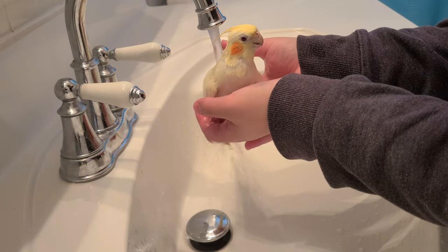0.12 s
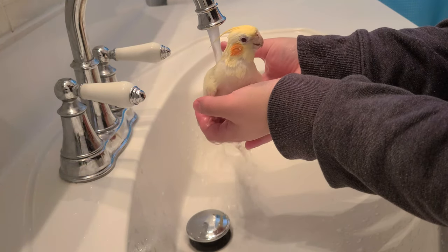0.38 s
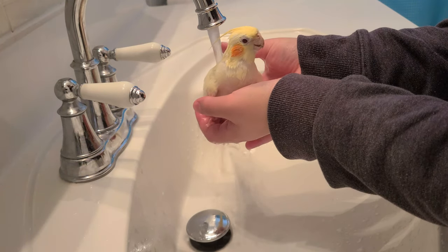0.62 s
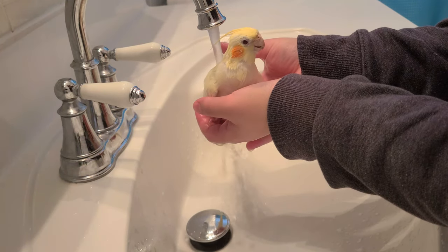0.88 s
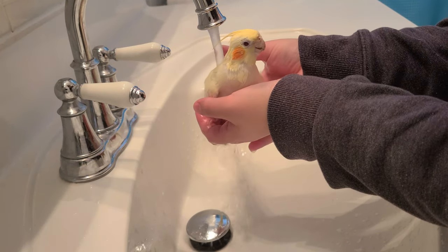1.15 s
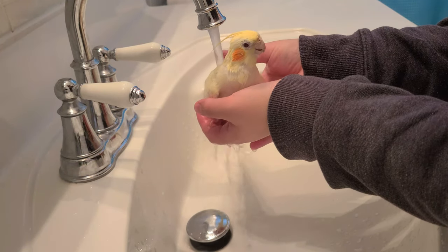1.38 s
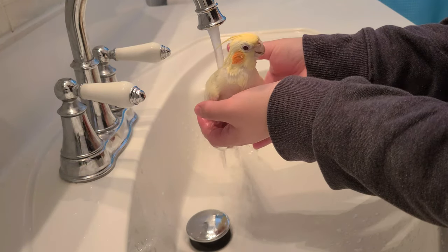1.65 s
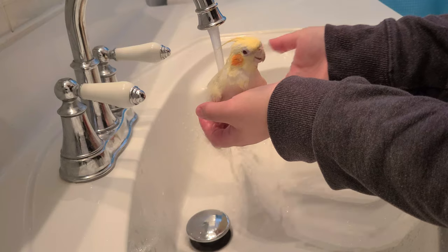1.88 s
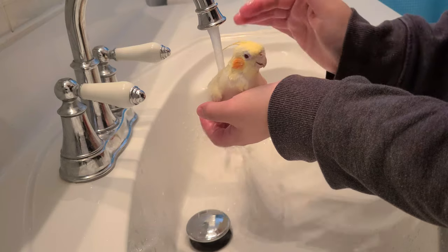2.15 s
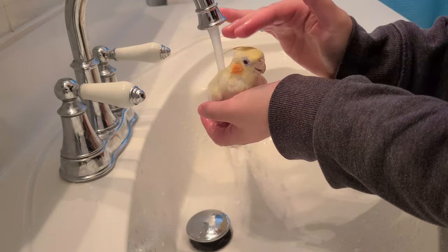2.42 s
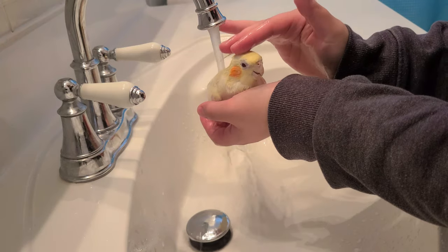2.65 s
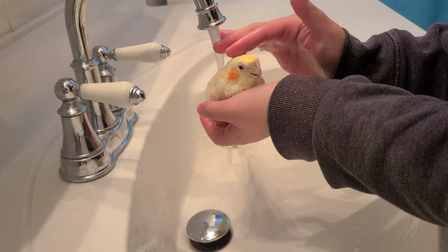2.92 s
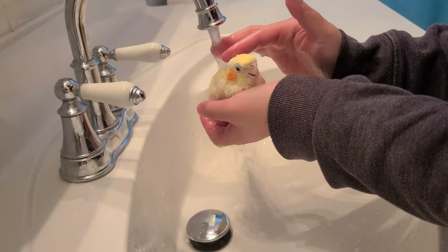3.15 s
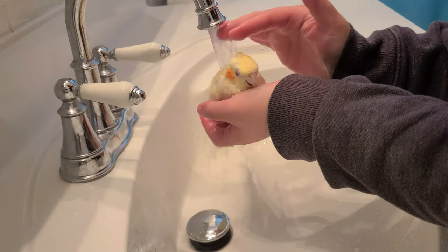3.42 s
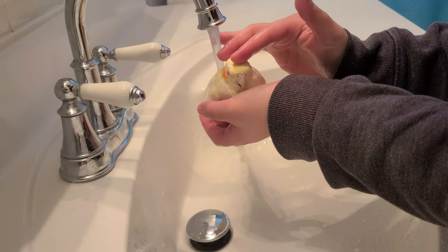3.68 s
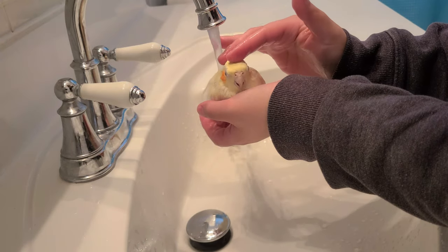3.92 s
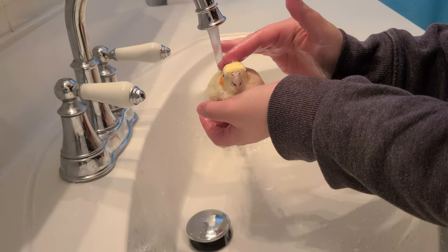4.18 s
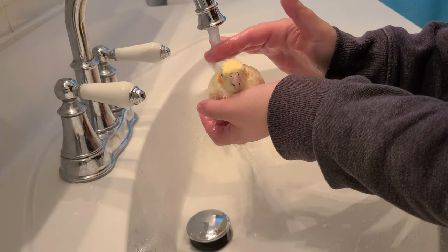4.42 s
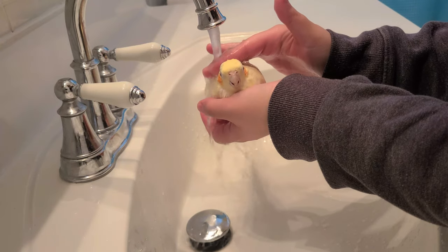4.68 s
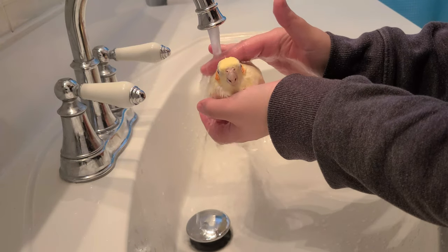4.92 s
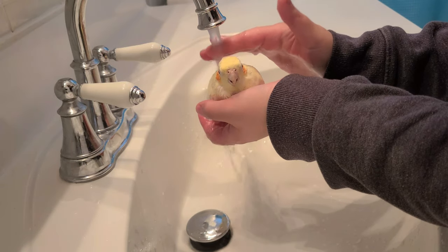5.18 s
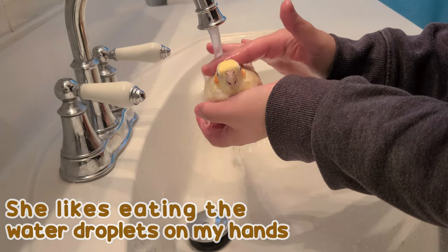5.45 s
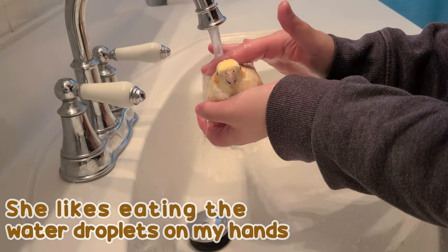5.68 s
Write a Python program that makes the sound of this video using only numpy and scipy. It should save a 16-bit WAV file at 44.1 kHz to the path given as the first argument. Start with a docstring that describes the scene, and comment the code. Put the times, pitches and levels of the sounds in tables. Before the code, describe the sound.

A tap runs into a ceramic sink in a small tiled bathroom, heard close in stereo. Its steady, airy hiss is brighter on the left. The drain sucks air about four times a second throughout. Tiny bubbles fizz, single drops tick and plop, and hands under the stream cause brief spatter near 1.6, 3.5 and 4 seconds, with a small wet slap around 5.5. A low room hum stays underneath.

```python
"""A tap with an aerator runs into a ceramic basin in a small hard-walled bathroom, close to two microphone ports.
The spout hisses as noise through pipe and basin resonances, with the hum of the room below; the drain slurps
air about four times a second as noise in its cavity modes. Drops and fizz ring as bubbles, slaps as an air
pocket, and spatter, plops and thuds are puffs of noise. A low rumble of wandering level and the whistle of
the overflow are narrow-band noise; a dense tail answers everything close."""
import sys
import numpy as np
from scipy import signal
from scipy.fft import rfft, irfft, next_fast_len
from scipy.io import wavfile
from scipy.ndimage import uniform_filter1d

SR = 44100
rng = np.random.default_rng(int(sys.argv[2]) if len(sys.argv) > 2 else 0)


def dump(signal):
    """Clip the signal to [-1, 1] and save it as 16-bit WAV at the path in sys.argv[1]."""
    limited = np.clip(np.atleast_2d(signal).T, -1, 1)
    pcm = np.round(limited * 32767).astype(np.int16)
    wavfile.write(sys.argv[1], SR, pcm)


def invert_db(level):
    """Linear amplitude ratio for a level in decibels (20 dB per decade), elementwise."""
    return 10 ** (np.asarray(level, dtype=float) / 20)


N = 256662   # length in samples

# Rush of the stream between its resonances: pitch_hz, left_db per Hz, right_db per Hz
RUSH = [(25, -92.5, -94), (80, -101, -99), (253, -93, -94.5), (493, -100.5, -102.5), (810, -95.5, -98.5),
        (1210, -94, -93), (2200, -92.5, -92.5), (3010, -90.5, -84.5), (5300, -104, -91),
        (7700, -86.5, -87.5), (9400, -83.5, -99.5), (11200, -82.5, -92.0), (14100, -77, -90),
        (15700, -77.5, -84)]
# Resonances of room, basin, drain pipe and spout: pitch_hz, width_hz, left_db per Hz, right_db per Hz
ROOM_HUM = [(57, 19, -80.7, -81.0), (123, 28, -74.0, -74.8), (145, 24, -81.2, -81.2), (176, 20, -88, -89),
            (291, 56, -90.5, -92.8)]
BASIN_MODES = [(346, 69, -95.5, -90.5), (360, 64, -83.7, -105), (408, 73, -83.4, -95.9),
               (459, 60, -92, -93), (622, 77, -87, -91), (830, 120, -97.0, -99), (977, 109, -97.5, -94),
               (1038, 32, -91.5, -101.5), (1148, 67, -94.2, -93.8), (1255, 130, -86.6, -105),
               (1272, 38, -93.6, -90.2), (1426, 39, -94.9, -85.6), (1472, 72, -87.4, -84.1),
               (1526, 104, -91.5, -84.7), (1584, 32, -86.4, -86.5), (1659, 137, -89.4, -90.9),
               (1765, 48, -80.5, -89), (1823, 287, -90.5, -94), (1853, 22, -84.5, -86),
               (1903, 26, -87.8, -106.5)]
PIPE_MODES = [(2480, 200, -89, -98), (2870, 260, -84, -94.6), (3255, 125, -78.7, -86.5),
              (3600, 400, -83.5, -94.4), (4030, 212, -82, -87.5), (4420, 150, -83, -89),
              (4680, 596, -78.6, -85.2), (5230, 105, -87.2, -86.9), (5480, 504, -82.5, -95.8),
              (5812, 110, -75.5, -81), (5990, 83, -82.8, -81.2), (6200, 179, -91, -88),
              (6490, 316, -89.5, -86.1), (6780, 246, -83, -83), (7150, 164, -82.8, -93.0),
              (7910, 299, -84.1, -89.7), (8280, 97, -83.1, -91.9), (8540, 332, -84.4, -104),
              (8870, 301, -85.7, -90.9)]
SPOUT_MODES = [(10680, 400, -77, -86), (11120, 100, -80, -88), (11350, 110, -71, -78),
               (11575, 130, -67, -78), (11890, 630, -77, -85), (12200, 500, -79, -88),
               (12750, 130, -74, -83), (13280, 300, -73.5, -90), (13750, 300, -77, -96),
               (14270, 350, -73.5, -96), (15070, 330, -69.5, -85), (15490, 300, -71, -86)]
# Power of the stream that both ports share: pitch_hz, share (0-1)
SHARED_POWER = [(30, 0.9), (150, 0.99), (290, 0.96), (600, 0.3), (1200, 0.7), (3000, 0.76), (8000, 0.92),
                (15000, 0.52)]
# Strength of the flow: time_s, gain_db
FLOW_GAIN = [(0, -1), (.4, 0), (1.5, 0), (2.5, 0.3), (3.5, 0.3), (4.5, 0.14), (5.2, 0.95), (5.82, 0.5)]

# Drain slurps: time_s, bright_stage_db, dark_stage_db
SLURP_TIMES = [(0.136, -50, -46.5), (0.303, -48, -46.5), (0.555, -48.5, -48), (0.801, -52, -48),
               (1.004, -45.5, -49), (1.2, -46, -48.5), (1.371, -47, -50.5), (1.612, -47, -48),
               (1.88, -49.5, -45.5), (2.16, -46, -45.5), (2.415, -48.5, -54), (2.67, -45, -48),
               (2.9, -45, -46), (3.182, -47, -48), (3.403, -48, -46), (3.626, -47, -47.5),
               (3.85, -47.5, -44), (4.122, -46.5, -43.5), (4.35, -49, -46), (4.555, -48.5, -43.5),
               (4.79, -46.5, -46), (5.025, -48, -46), (5.264, -47, -45.5), (5.488, -49, -45),
               (5.737, -47, -46)]
# Drain cavity modes: pitch_hz, width_hz of each filter pass, gain_db, left_minus_right_db,
# lateness (0 bright stage, 1 dark stage), nominal length_s
DRAIN_MODES = [(12700, 6700, -2.5, 19, -0.2, 0.036), (10800, 2100, -3.5, 12, 0.27, 0.04),
               (8720, 1800, 0.8, 9.5, 0.076, 0.034), (7120, 1870, 0, 9, 0.38, 0.047),
               (5820, 940, -4, 8, 0.51, 0.049), (4980, 640, 0, 6, 0.73, 0.063),
               (4360, 700, 0.5, 2.5, 0.96, 0.066), (3700, 700, -5.5, -8.5, 1.35, 0.044),
               (2770, 680, -12, -2, 1.68, 0.071), (1800, 84, -11.5, 6.5, 1.19, 0.091)]
SLURP_LAG_S = 0.035   # the dark stage follows the bright one by this much

# Plops and ticks of single drops: start_s, pitch_hz, level_db
DROP_HITS = [(0.0642, 2810, -37.5), (0.3078, 3630, -35), (1.6959, 2010, -45.7), (2.405, 3400, -44),
             (2.4339, 2710, -40.5), (2.446, 3300, -44), (2.462, 3600, -45), (3.5245, 2940, -34),
             (3.535, 3200, -41), (3.5455, 2800, -40), (3.558, 3100, -45), (3.8933, 3680, -34),
             (3.9, 4600, -35), (4.9304, 3550, -39), (5.5415, 4800, -34), (5.738, 3360, -36.5)]
RING_CYCLES = 10.0    # ring length of a drop's bubble in cycles, whatever its size
# Bubbles that burst at once and whip upward: start_s, low_hz, high_hz, level_db
SNAP_HITS = [(4.5185, 2520, 6000, -33), (4.9295, 2810, 7000, -29), (5.4625, 2700, 4800, -36),
             (5.732, 4000, 6500, -34)]
SNAP_S = 0.006

# Noise puffs, levels ahead of each layer's trim
# Spatter off the fingers: start_s, level_db, pitch_hz
SPATTER_HITS = [(0.9524, -34.5, 5820), (1.3576, -37, 6810), (1.5648, -26, 6600), (3.5114, -28.5, 4670),
                (3.9943, -25.5, 8750), (3.9945, -35, 1500), (3.9982, -30, 10800), (5.7924, -27, 7510),
                (5.7928, -33, 2200)]
# Slugs of water landing in the basin: start_s, level_db, pitch_hz
THUD_HITS = [(0.595, -47, 417), (0.784, -44.5, 200), (1.111, -48, 344), (1.541, -39.5, 347),
             (1.618, -44, 370), (1.655, -47, 390), (1.699, -48.5, 230), (2.173, -48, 353),
             (2.256, -46.5, 373), (3.028, -48, 371), (3.33, -48, 202), (3.545, -47, 380), (3.881, -44, 347),
             (3.991, -47, 353), (4.319, -46.5, 398), (4.978, -50, 340), (5.233, -46, 380), (5.45, -49, 210),
             (5.789, -48, 436)]
# Soft plops that set a basin mode ringing: start_s, level_db, pitch_hz
PLOP_HITS = [(0.7537, -44.5, 1490), (1.128, -48, 1500), (1.4841, -44, 1500), (2.3286, -45.5, 1470),
             (3.6459, -47.5, 595), (3.949, -49, 607), (3.9518, -40.5, 1510), (5.503, -43.5, 1800),
             (5.513, -48, 591)]

# A handful of water slaps into the cupped hands: start_s, level_db
SLAP_HITS = [(3.547, -45), (5.2304, -47), (5.5148, -37.5)]
# Modes of the air pocket in the cupped hands: pitch_hz, gain_db, t60_s
CUP_MODES = [(980, -3.5, 0.049), (1510, 0, .04), (2660, 2.5, 0.04), (1280, -6, .03)]
# The two ports favour different pitches of anything in the basin: pitch_hz, left_minus_right_db
PORT_LEAN = [(200, 2.5), (380, 9), (600, 1), (1000, -3), (1500, -6), (2800, 5), (4500, 0), (6000, 5),
             (11000, 5)]

# Level of the low rumble, 150-300 Hz, ahead of its trim: time_s, level_db
RUMBLE_LEVEL = [(0, -69), (.45, -66), (.75, -59), (.95, -63), (1.15, -59.5), (1.6, -61), (1.9, -67),
                (2.3, -66.5), (2.5, -59.5), (2.85, -70), (3.1, -59), (3.5, -63), (3.85, -60.5), (4.1, -66),
                (4.6, -66), (5.25, -67), (5.48, -57), (5.7, -63)]
# Bands of the low rumble: pitch_hz, width_hz, gain_db
RUMBLE_BANDS = [(175.2, 24, 0), (213, 36, -3)]
RUMBLE_TRIM_DB = -4.5
# Faint uneven singing of the overflow pipe: time_s, level_db
WHISTLE_LEVEL = [(0, -72), (.5, -74), (.7, -79), (1.05, -69), (1.4, -80), (2.05, -67), (2.3, -77),
                 (2.7, -66), (3.05, -70), (3.3, -81), (3.65, -67), (3.95, -68), (4.3, -78), (4.9, -68.5),
                 (5.1, -73), (5.3, -69), (5.82, -75)]
WHISTLE_HZ, WHISTLE_WIDTH_HZ = 609.8, 27   # width of each filter pass

ROOM_T60_S, ROOM_DB = 0.13, -9
CUTOFF_HZ = 15730


def rms_one(x):
    """Scales a sound to rms 1."""
    return x / np.sqrt(np.mean(x ** 2) + 1e-20)


def at_hz(points, hz):
    """Reads a curve at a pitch, on a logarithmic pitch axis."""
    table = np.array(points)
    return np.interp(np.log(hz), np.log(table[:, 0]), table[:, 1])


def over_time(points):
    """Draws a dB curve over the whole scene."""
    time_s, db = np.transpose(points)
    return np.interp(np.arange(N) / SR, time_s, db)


def sides(lean_db):
    """Left and right gains for a level difference."""
    return invert_db(np.multiply.outer([.5, -.5], lean_db))


def drift(rate_hz):
    """Slow chance of spread 1: noise at every 40th sample through a double one-pole low-pass."""
    r = np.exp(-80 * np.pi * rate_hz / SR)
    noise = rng.standard_normal(N // 40 + 2002)
    slow = signal.lfilter([1], [1, -2 * r, r * r], noise)[2000:]   # the filter has settled
    return np.interp(np.arange(N) / 40, np.arange(len(slow)), rms_one(slow))


def resonate(x, hz, width_hz):
    """Two-pole resonance, gain 1 on top."""
    r = np.exp(-np.pi * width_hz / SR)
    gain = (1 - r * r) / 2
    return signal.lfilter([gain, 0, -gain], [1, -2 * r * np.cos(2 * np.pi * hz / SR), r * r], x)


def resonate_twice(x, hz, width_hz):
    """The same resonance in series with itself, for steeper skirts."""
    return resonate(resonate(x, hz, width_hz), hz, width_hz)


def grains(per_s, spread_db):
    """Random clicks of very uneven size, rms 1."""
    size_db = spread_db * np.minimum(rng.exponential(1, N), 5)
    sizes = invert_db(size_db) * rng.choice([-1, 1], N)
    return rms_one(sizes * (rng.random(N) < per_s / SR)) + 1e-18


def bursts(rows, decay_ms, spread, trim_db):
    """A dying puff of noise per row, in a band round its pitch; spread is the width over the pitch."""
    out = np.zeros((2, N))
    u = np.arange(2000) / (decay_ms / 1000 * SR)   # time in decay lengths
    shape = np.minimum(5 * u, 1) * np.exp(-u)
    for start_s, level_db, hz in rows:
        narrow = resonate(rng.standard_normal(4000), hz, spread * hz)
        puff = resonate(narrow, hz, 2 * spread * hz)[2000:]
        puff = rms_one(puff * shape) * np.sqrt(np.mean(shape ** 2))
        at = round(start_s * SR)
        both = np.outer(sides(at_hz(PORT_LEAN, hz)), puff)
        out[:, at:at + 2000] += invert_db(level_db + trim_db) * both[:, :N - at]
    return out


def room(close):
    """Basin and tiles answer with a dense decaying tail, another one on each side."""
    t = np.arange(round(.4 * SR)) / SR
    tail = rng.standard_normal((2, len(t))) * invert_db(-60 * t / ROOM_T60_S) * (t > .003)
    tail = tail / np.sqrt(np.sum(tail ** 2, axis=1, keepdims=True))
    return invert_db(ROOM_DB) * signal.fftconvolve(close, tail, axes=1)[:, :N]


def rumble(wander_db=2.5):
    """Low narrow-band noise whose level wanders."""
    noise = rng.standard_normal(N) + .25 * rng.standard_normal((2, N))
    tone = np.zeros((2, N))
    for hz, width_hz, gain_db in RUMBLE_BANDS:
        # two passes narrow the band, so each is set wider
        tone += invert_db(gain_db) * rms_one(resonate_twice(noise, hz, 1.44 * width_hz))
    level_db = over_time(RUMBLE_LEVEL) + RUMBLE_TRIM_DB + wander_db * drift(8.6)
    return rms_one(tone) * invert_db(level_db) * sides(2.0)[:, None]


def whistle():
    """Air drawn across the overflow opening excites its one narrow mode."""
    noise = rng.standard_normal(N) + 1.45 * rng.standard_normal((2, N))
    tone = resonate_twice(noise, WHISTLE_HZ, WHISTLE_WIDTH_HZ)
    return rms_one(tone) * invert_db(over_time(WHISTLE_LEVEL))


def fizz(level_db=-64.5):
    """Countless small bubbles ring a few cycles each, at pitches spread over four octaves."""
    out = np.zeros((2, N))
    for hz in np.geomspace(330, 6000, 16):
        ring = resonate(grains(per_s=hz / 50.0, spread_db=5.0), hz, hz / 7.34)
        ring = rms_one(resonate(ring, hz, hz / 4.2)) * invert_db(3.9 * np.log2(hz / 2000))
        pair = [ring, np.roll(ring, rng.integers(-30, 30))]   # up to 30 samples between the ports
        out += pair * sides(rng.normal(0, 2.6))[:, None]
    return invert_db(level_db) * rms_one(out)


def thuds():
    """Dull knocks where a slug of water lands on the ceramic."""
    return bursts(THUD_HITS, decay_ms=17.0, spread=0.17, trim_db=-7.5)


def plops():
    """Short narrow rings that sink into the flow."""
    return bursts(PLOP_HITS, decay_ms=11.0, spread=0.045, trim_db=-3.0)


def spatter():
    """Bright snaps where spray breaks on the fingers."""
    return bursts(SPATTER_HITS, decay_ms=1.0, spread=0.97, trim_db=-3.0)


def slaps():
    """Each slap sets every mode of the air pocket ringing, with a strength of its own."""
    out, t = np.zeros((2, N)), np.arange(4000) / SR
    for start_s, level_db in SLAP_HITS:
        at = round(start_s * SR)
        for hz, gain_db, t60_s in CUP_MODES:
            mode_db = level_db + gain_db + rng.normal(0, 1.5) - 60 * t / t60_s
            ring = np.sin(2 * np.pi * hz * t) * invert_db(mode_db) * np.minimum(t / .001, 1)
            out[:, at:at + 4000] += np.outer(sides(at_hz(PORT_LEAN, hz)), ring)
    return out


def snaps(rough=0.42):
    """A fast upward sweep, roughened by the tearing film."""
    out, u = np.zeros((2, N)), np.arange(round(SNAP_S * SR)) / (SNAP_S * SR)
    shape = np.minimum(u / .06, 1) * np.exp(-1.8 * u) * (1 - u ** 4)
    for start_s, low_hz, high_hz, level_db in SNAP_HITS:
        hz = low_hz * (high_hz / low_hz) ** u
        tearing = uniform_filter1d(rng.standard_normal((2, len(u))), size=4)
        sweep = np.sin(2 * np.pi * np.cumsum(hz) / SR) * (1 + rough * tearing)
        at = round(start_s * SR)
        out[:, at:at + len(u)] += invert_db(level_db) * sides(at_hz(PORT_LEAN, hz)) * sweep * shape
    return out


def drops(rise=0.032, crack_db=-5.0):
    """A trapped bubble rings and climbs in pitch as it nears the surface; its birth cracks."""
    out = np.zeros((2, N))
    for start_s, hz, level_db in DROP_HITS:
        ring_s = RING_CYCLES / hz
        u = np.arange(round(6 * ring_s * SR)) / (ring_s * SR)     # time in ring lengths
        phase = 2 * np.pi * hz * np.cumsum(1 + rise * (u - .5)) / SR
        ring = np.sin(phase) * 1.8 * (1 - np.exp(-u / .1)) * np.exp(-1.1 * u)
        crack = resonate(rng.standard_normal(9000), hz, hz * .8)[-len(u):]
        sound = invert_db(level_db) * (ring + invert_db(crack_db) * 2 * crack * np.exp(-1.6 * u))
        at = round(start_s * SR)
        gains = sides(at_hz(PORT_LEAN, hz))
        for side, start in enumerate((at, at + rng.integers(-2, 3))):     # the ports lie apart
            out[side, start:start + len(u)] += gains[side] * sound[:N - start]
    return out


def slurps(grit=0.66, alike=0.57, ragged_db=1.6):
    """Air tears through the closing water film: high cavity modes sound first, low ones as the gap widens."""
    out = np.zeros((2, N))
    gritty = grains(per_s=2500., spread_db=3.0)
    air = grit * gritty + alike * rng.standard_normal(N) + rng.standard_normal((2, N)) * 0.67
    for hz, width_hz, gain_db, lean_db, late, length_s in DRAIN_MODES:
        swell = np.zeros(N)
        darkness = np.clip(late, 0, 1)
        span = round(1.46 * length_s * SR)
        u = np.arange(span) / span
        # quick rise, rounded fall
        hump = np.minimum(u / (0.11 + 0.082 * darkness), 1) * np.cos(np.pi * u / 2) ** 1.01
        for time_s, bright_db, dark_db in SLURP_TIMES:
            at = round((time_s + late * SLURP_LAG_S - length_s / 2) * SR)
            level_db = (1 - darkness) * bright_db + darkness * dark_db
            swell[at:at + span] += (invert_db(level_db) * hump)[:N - at]
        tone = rms_one(resonate_twice(air, hz, width_hz))
        out += tone * swell * invert_db(gain_db + ragged_db * drift(64.0)) * sides(lean_db)[:, None]
    return out


def stream_power(hz, ripple_db=1.35):
    """Power spectrum at each port: the rush, its resonances and a fine ripple."""
    rush = np.array(RUSH)
    power = np.array([invert_db(2 * at_hz(rush[:, [0, side]], hz)) for side in (1, 2)])
    for centre, width, left_db, right_db in ROOM_HUM + BASIN_MODES + PIPE_MODES + SPOUT_MODES:
        near = slice(*np.searchsorted(hz, [centre - 5 * width, centre + 5 * width]))
        bell = 1 / (1 + (2 * (hz[near] - centre) / width) ** 2) ** 2
        power[:, near] += invert_db(2 * np.array([[left_db], [right_db]])) * bell
    # echoes in the tiled room leave a fixed fine ripple on the colour
    ripple = [np.interp(hz / 30.0, np.arange(1000), row) for row in rng.standard_normal((2, 1000))]
    return power * invert_db(2 * ripple_db * np.array(ripple) * (hz > 2000))


def stream(slow_db=0.81, fast_db=2.5, turn=2.93, turn_hz=240.0, patter_db=1.38):
    """Noise coloured by the resonances; each quarter-octave band flickers a little on its own."""
    size = next_fast_len(N)
    hz = np.maximum(np.fft.rfftfreq(size, 1 / SR), 1)
    power = stream_power(hz)
    # the two ports hear one source by different echo paths: above the bass the phase between them wanders
    wander = np.interp(hz / 45.0, np.arange(800), rng.standard_normal(800))
    turned = np.exp(1j * turn * wander * np.clip(hz / turn_hz - 1, 0, 1))
    alike = np.clip(at_hz(SHARED_POWER, hz), 0, 1)
    shared, left, right = rfft(rng.standard_normal((3, size)))
    common = np.sqrt(alike) * shared * [np.ones(len(hz)), turned]
    separate = np.sqrt(1 - alike) * np.array([left, right])
    spectrum = (common + separate) * np.sqrt(power * SR / 2)
    out = np.zeros((2, N))
    step = 4 * np.log2(np.clip(hz, 250, 16000) / 250)   # quarter octaves above 250 Hz
    together_db = slow_db * drift(5.0)
    for k in range(25):
        band = irfft(spectrum * np.clip(1 - abs(step - k), 0, 1), size)[:, :N]
        # the spout hiss on top stays smooth
        broken = np.interp(k, [0, 2, 10, 14, 19, 22], [.8, 1.4, 1, .55, .5, .15])
        flicker_db = broken * fast_db * drift(8.6) + patter_db * (4 < k < 20) * drift(30.0)
        out += band * invert_db(together_db + flicker_db)
    return out * invert_db(over_time(FLOW_GAIN))


def scene():
    """Sums all layers; only the close water sounds feed the room tail."""
    close = drops() + snaps() + plops() + slaps() + spatter() + thuds() + fizz()
    return stream() + rumble() + whistle() + slurps() + close + room(close)


def top_cut(x):
    """Nothing passes above the cut-off."""
    return signal.sosfilt(signal.butter(12, 16590, fs=SR, output="sos"), x)


def record(dry):
    """A steep elliptic low-pass cuts the top of the mix."""
    low_pass = signal.ellip(14, .5, 60, CUTOFF_HZ, fs=SR, output="sos")   # .5 dB ripple, 60 dB down
    mix = signal.sosfilt(low_pass, dry)
    return top_cut(mix)


dry = scene()
out = record(dry)
dump(out)
```